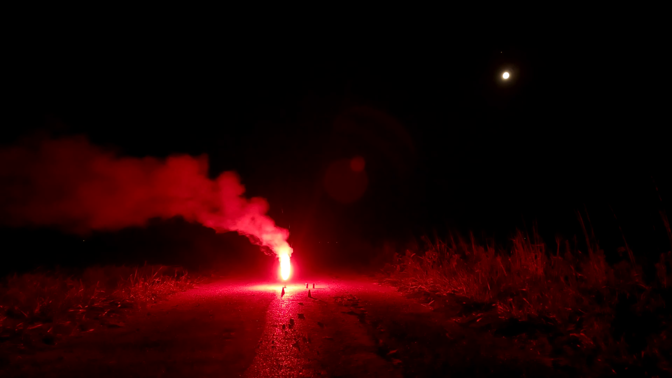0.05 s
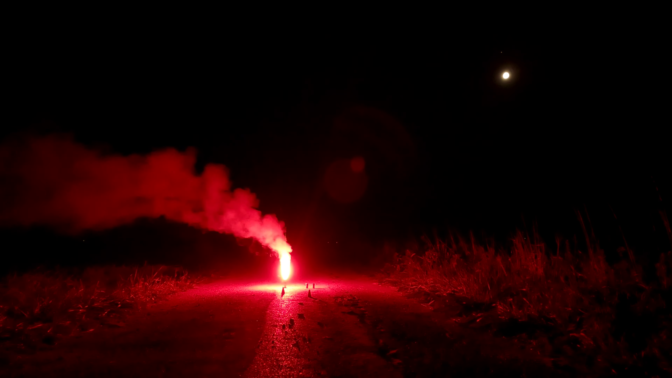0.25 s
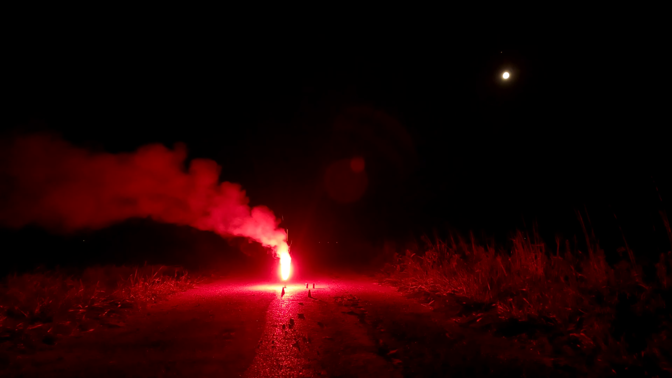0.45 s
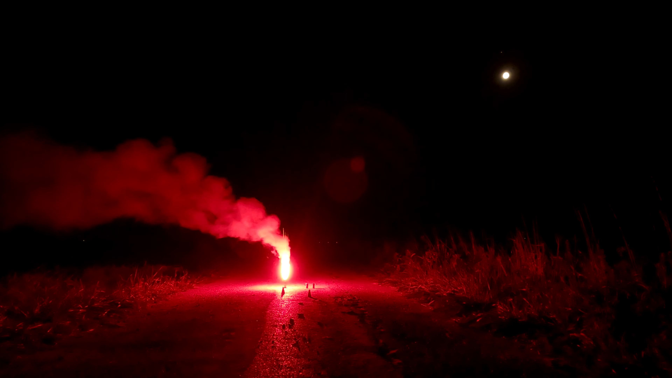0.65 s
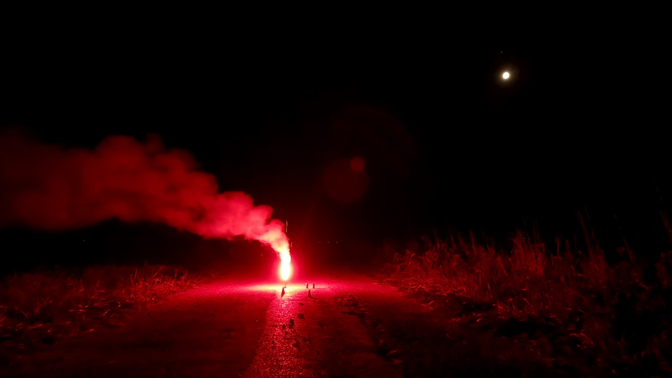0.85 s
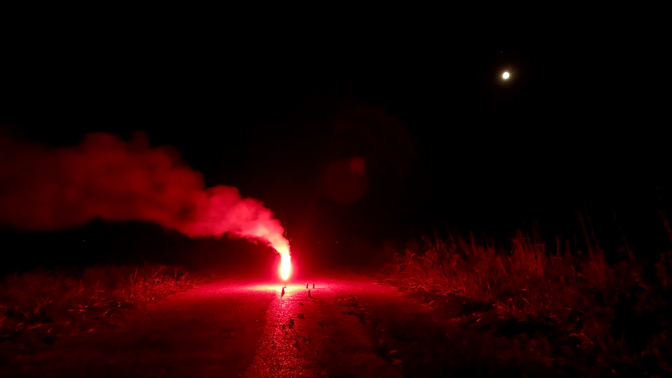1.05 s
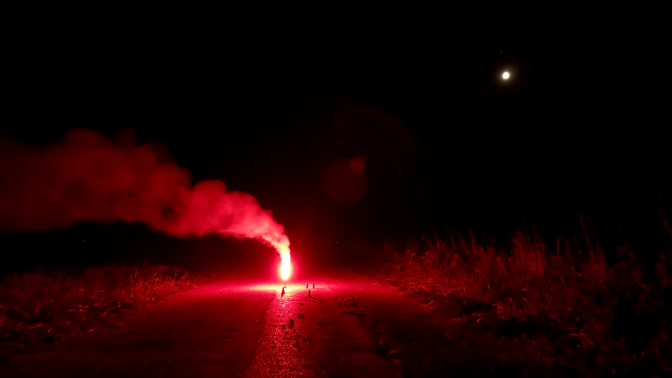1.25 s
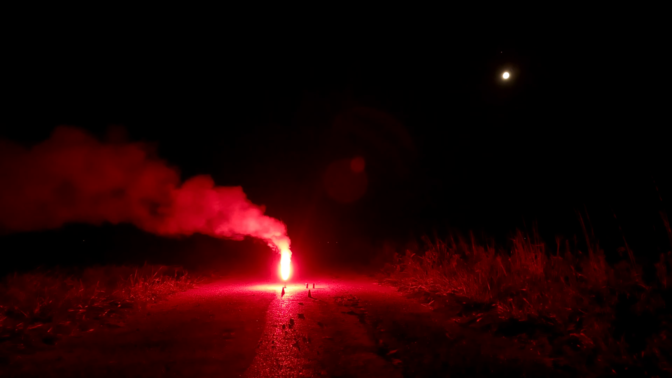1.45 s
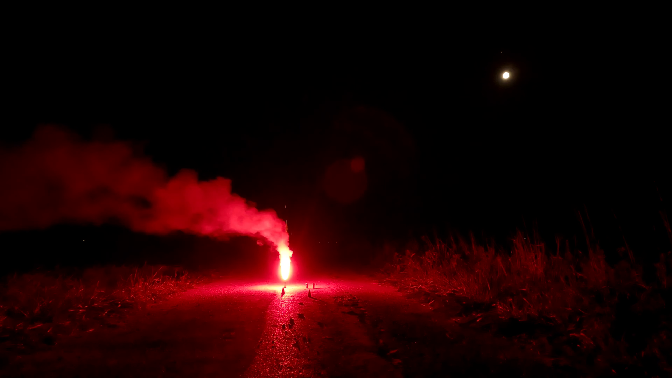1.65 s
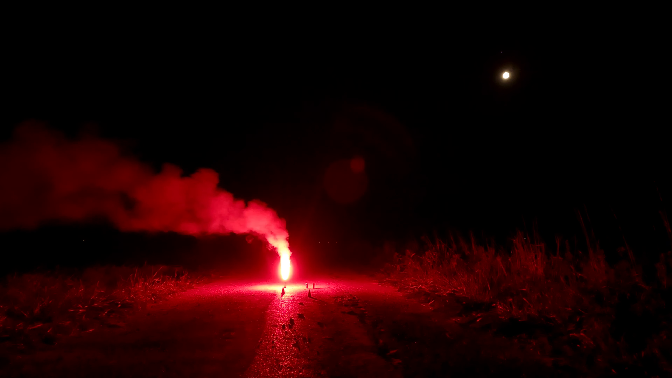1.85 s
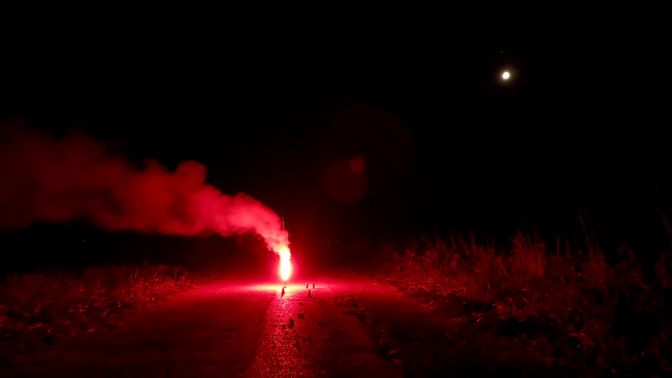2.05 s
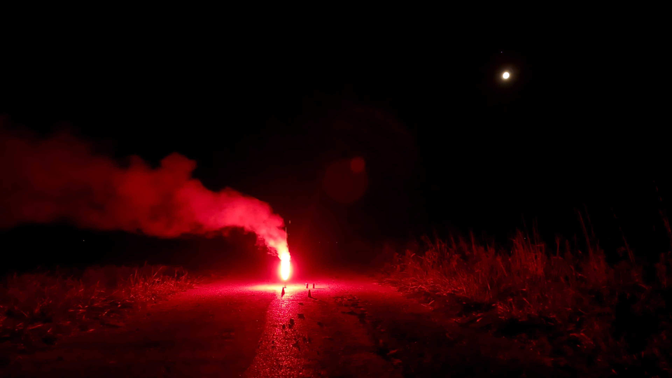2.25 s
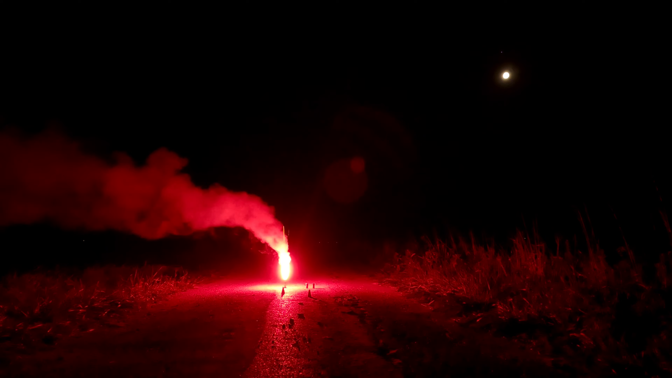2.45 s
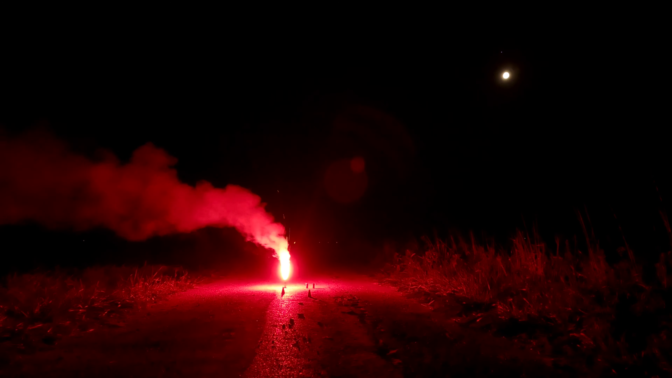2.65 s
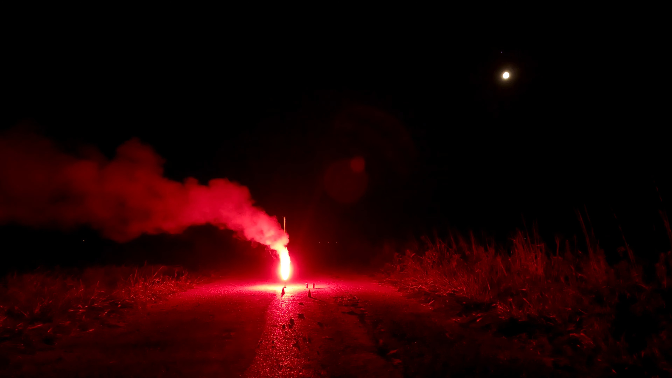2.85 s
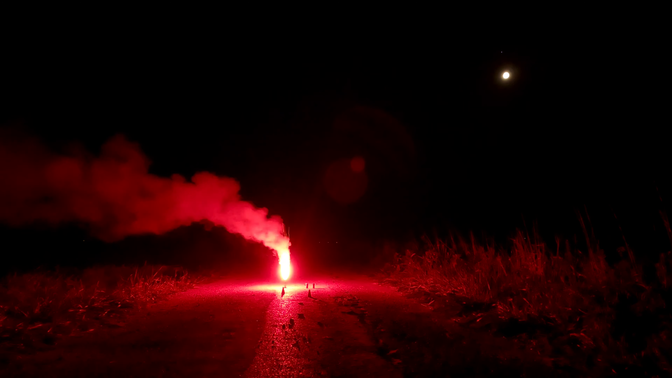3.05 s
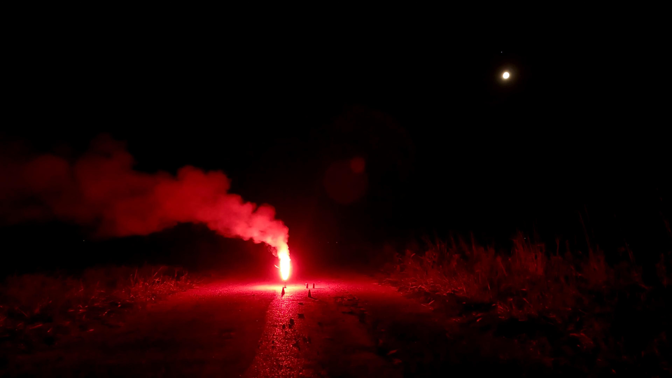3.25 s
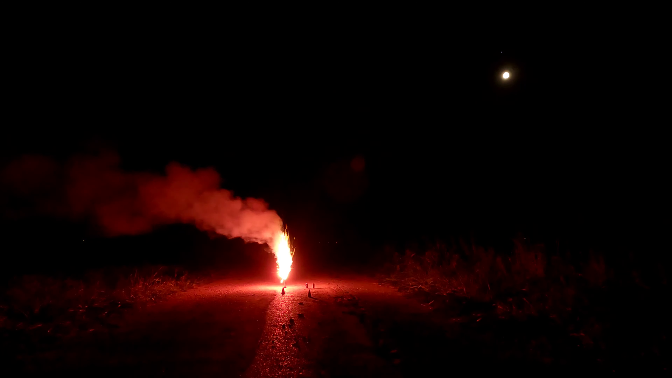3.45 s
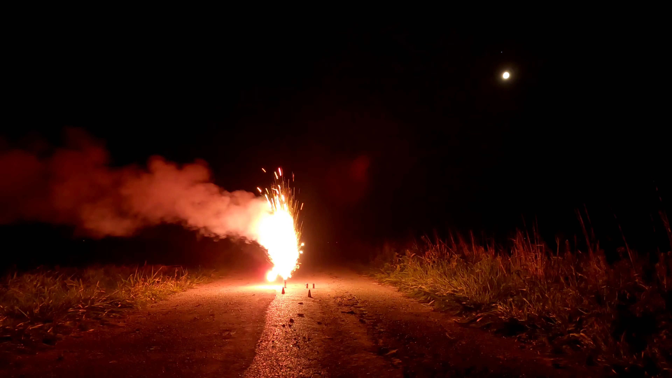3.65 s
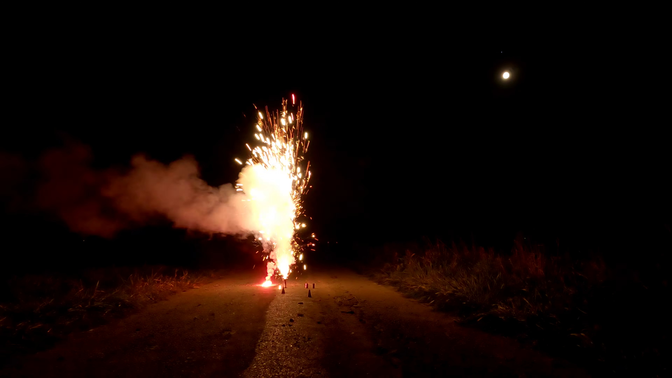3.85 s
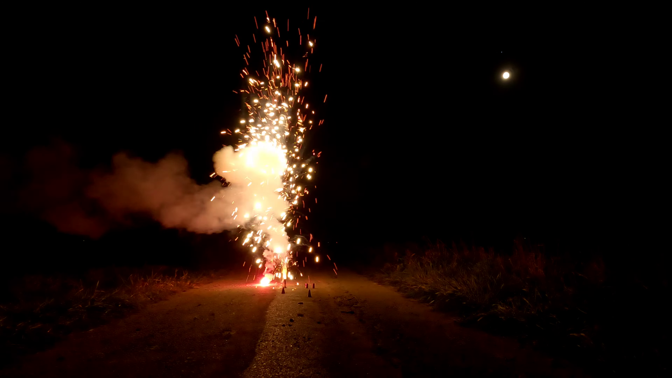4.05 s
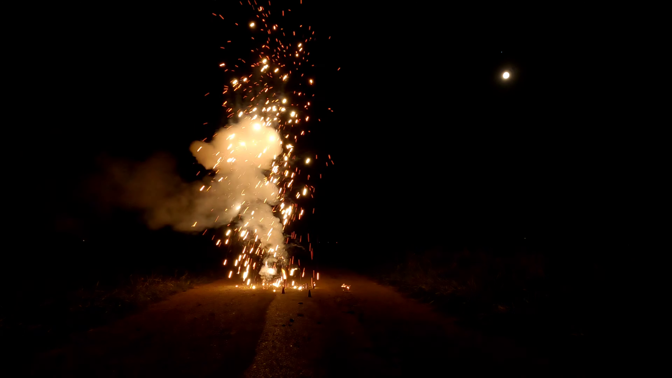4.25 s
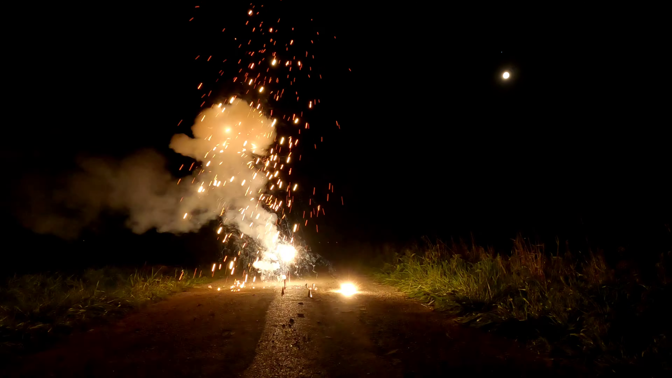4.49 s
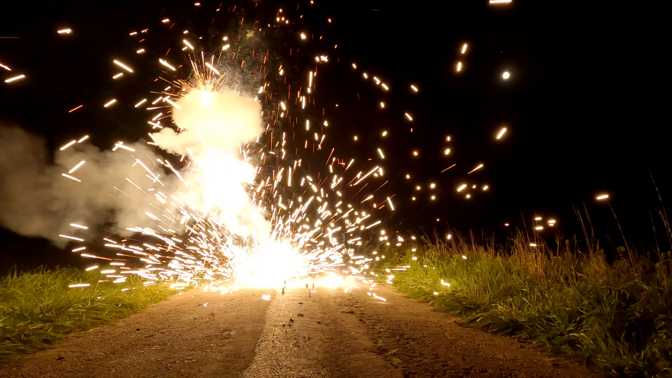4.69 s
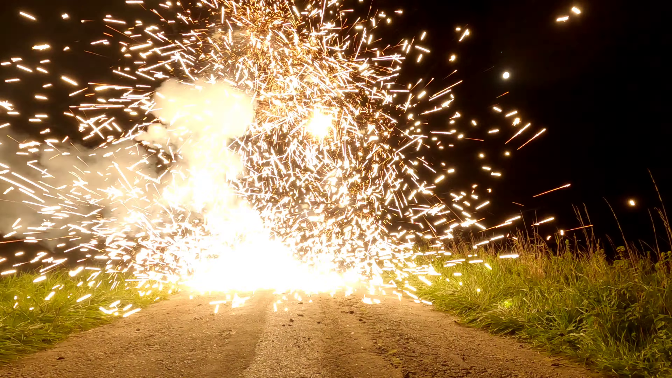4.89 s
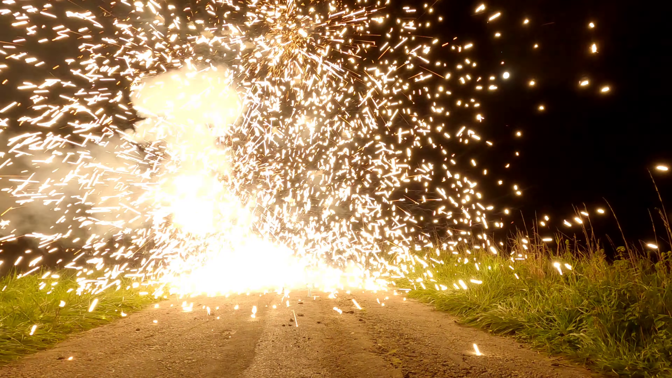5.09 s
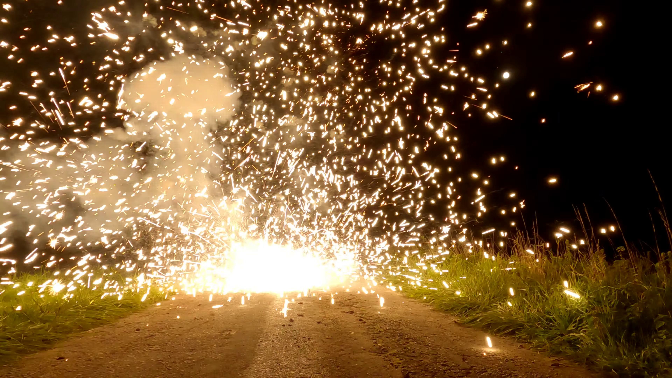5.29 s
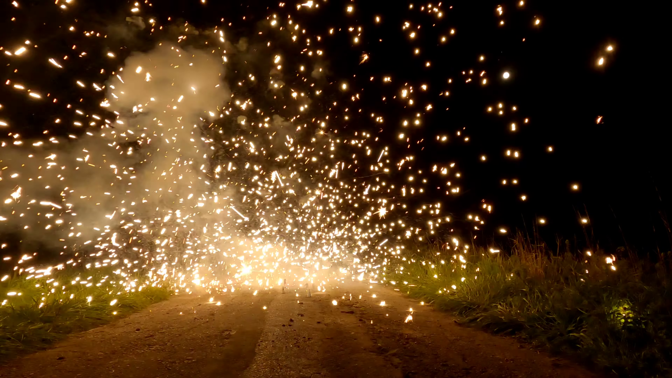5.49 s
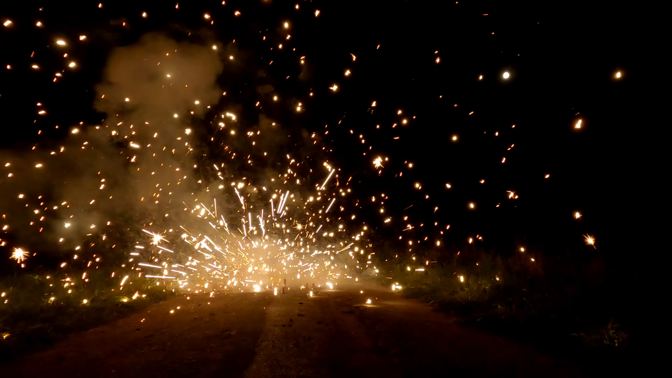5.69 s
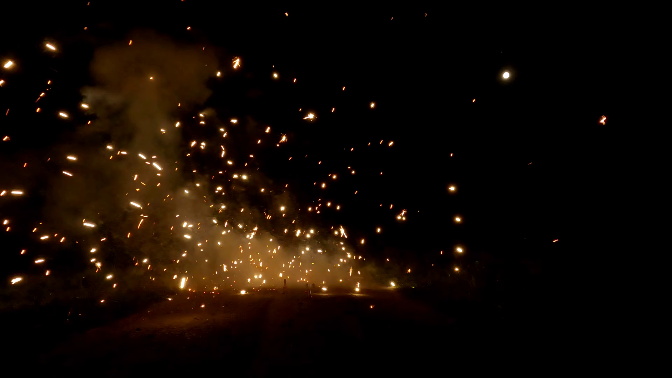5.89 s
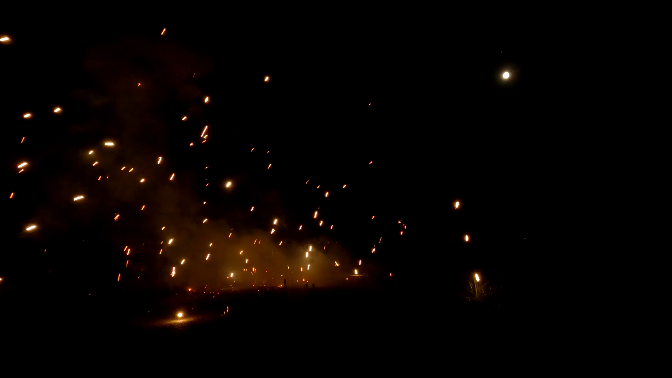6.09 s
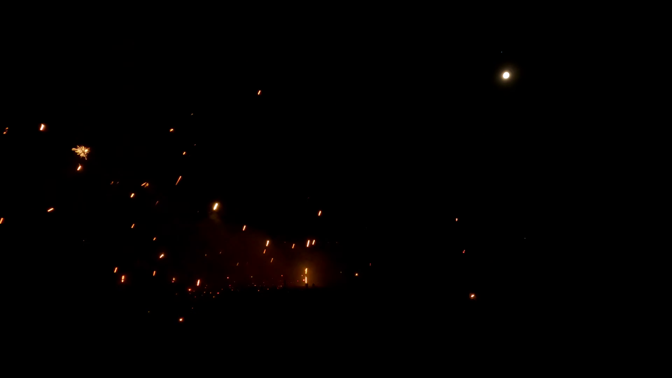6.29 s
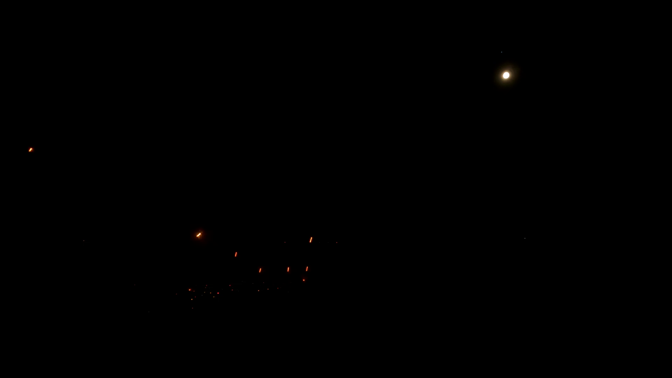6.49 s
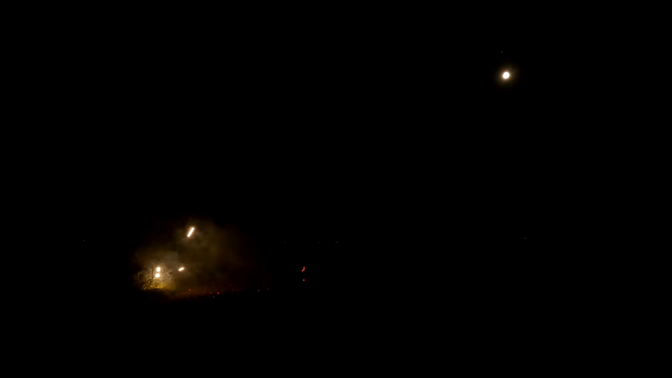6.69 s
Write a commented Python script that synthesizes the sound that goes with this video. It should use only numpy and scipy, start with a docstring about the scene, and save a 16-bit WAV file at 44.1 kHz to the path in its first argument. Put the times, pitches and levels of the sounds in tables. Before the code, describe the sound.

Steady fluttering flare hiss gives way to a short roaring spark fountain, then a dense overloaded volley of cracks, sparse ticks, one late loud bang.

```python
"""Flare and ground firework

A red flare hisses on a country road at night: shaped noise, flutter and random sputter.
It lights a ground firework, which roars up in a jet of sparks and fizzes: swells of noise and tiny snaps.
It bursts into a volley of crackling stars: shocks, gas pushes and thumps, scattered by gravel and fields.
The last sparks tick and die away over the fields; one late star goes off."""
import sys
import numpy as np
from scipy import signal
from scipy.fft import rfft, irfft, next_fast_len
from scipy.io import wavfile

SR = 44100
rng = np.random.default_rng(int(sys.argv[2]) if len(sys.argv) > 2 else 0)


def wrap_up_sound(samples):
    """Save the sound to the file named by the first command line argument, as 16-bit audio."""
    columns = np.atleast_2d(samples).T
    # keep every value between -1 and 1, then stretch to whole-number steps
    tamed = np.clip(columns, -1, 1)
    steps = np.round(tamed * 32767).astype(np.int16)
    wavfile.write(sys.argv[1], SR, steps)


N = 296793
TIME_S = np.arange(N) / SR

# Relative noise spectra. Each row: frequency in Hz, density in dB per Hz.
NIGHT_SPECTRUM = [(100, 4.5), (700, -17), (1100, 3.5), (1700, 5), (5000, -13), (15000, -38)]
WIND_SPECTRUM = [(20, -1.5), (35, 1.5), (70, 1.5), (250, -53.5)]
FLARE_SPECTRUM = [(20, -22), (45, -0.5), (110, 0), (260, -4), (500, -8.5), (1000, -12), (1800, -16),
                  (2600, -11.5), (3500, -17.5), (5100, -19.5), (5900, -31), (8800, -35), (12200, -41.5),
                  (15500, -45.5)]
SPUTTER_SPECTRUM = [(500, -21), (2500, 0), (6000, -7.5), (9000, -7.5), (12300, -11.5), (15500, -26)]
JET_SPECTRUM = [(15, -47), (25, -14.5), (70, -2.5), (117, -3), (317, -5.5), (363, -9.5), (439, -10),
                (818, -14), (911, -9.5), (1330, -13), (1560, -14.5), (3340, -22.5), (5000, -23),
                (5730, -32.5), (12200, -41), (16000, -57)]
FIZZ_SPECTRUM = [(300, -25), (700, -12.5), (1100, -0.5), (3000, -2), (5500, 0.5), (8000, -2), (10500, -9),
                 (12300, -11), (15500, -19.5)]
RUMBLE_SPECTRUM = [(20, -10), (60, 1.5), (110, 0.5), (160, -5.5), (230, -15), (350, -17), (600, -38),
                   (1500, -58)]

# Relative spectra of reflections off gravel and grass, then far fields. Each row: frequency in Hz, dB per Hz.
SCATTER_SPECTRUM = [(60, -7), (250, 6.5), (600, 3), (1500, -0.5), (3200, -1.3), (5000, 3), (7000, 1.5),
                    (12000, -16), (15500, -24)]
FAR_ECHO_SPECTRUM = [(200, 4), (600, 0.5), (1200, -1.5), (2500, -4.5), (5000, -2), (15000, -35)]

# Left-right correlation of noise. Each row: frequency in Hz, correlation from 0 to 1.
EAR_LIKENESS = [(60, 1), (300, 1), (1400, 1), (3100, 0.98), (7000, 0.92), (11000, 0.26), (15000, .3)]

# Phase lag of the left microphone port. Each row: frequency in Hz, lag in radians.
PORT_PHASE_LAG = [(150, .02), (3000, 0.62), (8000, 0.23), (11500, 1.13), (14000, 1.8)]

# Breeze on the microphone. Each row: start in seconds, attack in seconds, hold in seconds,
# level in dB, release in dB per second.
GUSTS = [(1.2, .22, 1.05, -41, 34)]

# Fuse puff, jet catching, surge, guttering. Each row: start in seconds, attack in seconds,
# hold in seconds, level in dB, release in dB per second.
JET_SURGES = [(3.295, .01, .006, -35, 500), (3.32, .21, .275, -26.2, 360), (3.575, .14, .028, -15.4, 350.5),
              (3.8, .03, .02, -49, 45)]

# Spark showers from the fuse, the jet, before the burst, from the stars, from the main volley, and landing.
# Each row: start in seconds, attack in seconds, hold in seconds, level in dB, release in dB per second.
SPARK_SHOWERS = [(3.315, .012, .03, -50, 100), (3.22, .43, 0.081, -37.7, 20.5),
                 (4.31, 0.19, .02, -45.5, 100), (4.55, .1, 0.63, -51, 26.5), (4.72, 0.091, 0.18, -36, 90.5),
                 (5.82, .11, .03, -57.6, 72)]

# Steady low rumble, its level rising and sinking. Each row: time in seconds, level in dB.
RUMBLE_LEVEL = [(3.3, -67), (3.8, -43.5), (4.45, -42.5), (4.8, -35.5), (6.1, -57.5), (6.73, -50)]

# Single sparks snapping. Each row: time in seconds, nominal peak in dB.
SPARKS = [(4.148, -21), (4.206, -20.5), (4.229, -23), (4.24, -17), (4.26, -15.3), (4.737, -18),
          (6.037, -28.5), (6.053, -26.5), (6.121, -25.5), (6.254, -32.5), (6.334, -28)]

# Bangs, each one star or a quick chain, with mean strengths before spread and panning. Each row:
# start in seconds, length in seconds, star count, crack in dB, crack brightness in Hz, thump in dB.
BANGS = [(4.574, 0.0013, 2, -1, 3400, -17), (4.6067, 0.0014, 2, -13.5, 4900, -16),
         (4.6393, 0.012, 2, -8, 3950, -12), (4.6821, 0, 1, -5.7, 3700, -8.5),
         (4.7021, .0065, 2, -6.2, 3200, -8.3), (4.76, 0.012, 3, -4.5, 4340, -9.5),
         (4.9927, .0013, 2, -6.5, 3900, -13.5), (5.0097, .0067, 2, -7, 3700, -13.5),
         (5.034, 0, 1, -7.5, 6000, -11), (5.0425, .0044, 3, -6, 3700, -17),
         (5.0835, .012, 4, -7, 3200, -12), (5.1029, .01, 3, -7.5, 5000, -17),
         (5.1395, .010, 2, -6, 4520, -12.5), (5.163, 0.011, 2, -10, 4700, -17),
         (5.241, 0.00064, 2, -4.6, 5300, -17.5), (5.2567, 0.0092, 4, -8, 3220, -13),
         (5.3099, .0092, 3, -6, 3000, -10.7), (5.3301, .0175, 3, -6.8, 3600, -12),
         (5.3677, 0, 1, -6, 2700, -16), (5.3949, 0.0034, 2, -5.5, 5000, -14),
         (5.4249, .0195, 3, -7.5, 3690, -13), (5.4964, 0.00095, 2, -6.5, 3490, -14),
         (5.6321, 0, 1, -2, 3100, -11), (5.6627, 0, 1, -7, 4700, -12.5),
         (5.7384, .0018, 2, -4.5, 3800, -12), (5.7508, 0, 1, -8.5, 2900, -16),
         (5.8177, 0.0017, 1, -5.5, 3980, -13), (6.6586, 0, 1, 0.3, 2750, -12)]

# Main volley, where most stars catch at once. Each row: time in seconds, stars per second.
VOLLEY_RATE = [(4.789, 210), (4.815, 125), (4.877, 90), (4.92, 270), (4.958, 115), (4.979, 115)]

ATTACK_POWER = 1.4  # a swell grows as this power of time

# The flare burns evenly until the firework smothers it.
FLARE_DB, FLARE_SAG_S, FLARE_SAG_DB = -36, 3.32, 2.5
FLARE_OUT_S, FLARE_FALL_DB_PER_S = 3.7, 185

# Faint ticks of falling embers, with nominal peaks.
EMBERS_FROM_S, EMBERS_TO_S, EMBERS_PER_S = 5.89, 6.11, 65
EMBER_MIN_DB, EMBER_SPREAD_DB = -40, 9

# Stars of one batch differ in timing (share of their spacing), strength and brightness.
STAR_JITTER, STAR_SPREAD_DB, STAR_SPREAD_OCT = .35, 1.5, .3
STAR_PAN_DB = 3.5  # left-right placing, full range per ear
VOLLEY_CRACK_DB, VOLLEY_BRIGHT_HZ, VOLLEY_THUMP_DB, VOLLEY_JITTER = -7.0, 3940, -13.4, .5

PORT_RING_HZ, PORT_RING_Q, PORT_RING_DB = 12100, 9, -3
ROLLOFF_HZ, CUTOFF_HZ = 13200, 16300


def from_db(db):
    """Decibels to gain."""
    return 10 ** (np.asarray(db) / 20)


def rms_one(x):
    """Scale to unit power."""
    return x / np.sqrt(np.mean(x ** 2) + 1e-20)


def add(track, start_s, sound):
    """Mix a short sound in at its start time."""
    i = int(round(start_s * SR))
    track[..., i:i + sound.shape[-1]] += sound[..., :N - i]


def level(rows):
    """Gain over time, interpolated in dB."""
    return from_db(np.interp(TIME_S, *np.transpose(rows)))


def swells(rows):
    """Gain over time of overlapping swells, summed in power."""
    power = 0
    for start_s, attack_s, hold_s, db, release_db_per_s in rows:
        rise = np.clip((TIME_S - start_s) / attack_s, 0, 1) ** ATTACK_POWER
        released_s = np.maximum(TIME_S - start_s - attack_s - hold_s, 0)
        power = power + (rise * from_db(db - release_db_per_s * released_s)) ** 2
    return np.sqrt(power)


def at_hz(points, hz):
    """Read a curve on a log-frequency axis."""
    f, value = np.transpose(points)
    return np.interp(np.log(np.maximum(hz, 1)), np.log(f), value)


def colour(x, spectrum):
    """Filter a signal by a spectrum."""
    n = x.shape[-1]
    gain = from_db(at_hz(spectrum, np.fft.rfftfreq(n, 1 / SR)))
    return irfft(rfft(x) * gain, n)


def lowpass(x, order, cutoff_hz):
    """Butterworth low-pass."""
    return signal.sosfilt(signal.butter(order, cutoff_hz, fs=SR, output="sos"), x)


def drift(rate_hz):
    """Smooth random wander of spread 1, with rate_hz knots per second."""
    knots = rng.standard_normal(4096)
    return rms_one(np.interp(TIME_S * rate_hz, np.arange(len(knots)), knots))


def noise(spectrum, flicker_db, flicker_hz):
    """Stereo noise, alike in both ears in the bass, with a level that flickers by flicker_db."""
    n = next_fast_len(N)
    hz = np.fft.rfftfreq(n, 1 / SR)
    alike = np.clip(at_hz(EAR_LIKENESS, hz), 0, 1)
    mid, side = rfft(rng.standard_normal((2, n)))
    both = np.sqrt(1 + alike) * mid + np.sqrt(1 - alike) * side * [[1], [-1]]
    steady = irfft(both * from_db(at_hz(spectrum, hz)), n)[:, :N]
    return rms_one(steady * from_db(flicker_db * drift(flicker_hz)))


def grains(per_s, spread_db, spectrum):
    """Tiny random snaps of uneven size and either sign."""
    sizes = from_db(spread_db * np.minimum(rng.exponential(1, N), 4)) * rng.choice([-1, 1], N)
    clicks = sizes * (rng.random(N) < per_s / SR)
    padded = np.pad(clicks, (0, next_fast_len(N) - N))
    return rms_one(colour(padded, spectrum)[:N])


def scatter(spectrum, t60_s, rise_s, size):
    """A dying spray of small reflections, of unit energy per ear on average."""
    t = TIME_S[:size]
    envelope = from_db(-60 * t / t60_s) * (1 - np.exp(-t / rise_s))
    tail = colour(rng.standard_normal((2, size)), spectrum) * envelope
    tail = tail[0] + 0.76 * tail[1] * [[1], [-1]]
    return rms_one(tail) / np.sqrt(size)


def two_pole(f, hz, q):
    """Response of a damped resonator, read at frequencies f."""
    return 1 / (1 - (f / hz) ** 2 + 1j * f / (hz * q))


def shock(hz, low_share=0.21, low_q=1.28, top_q=0.88, air_hz=7500, size=2048):
    """A steep pressure spike and its suction, rounded by the air; a lower hz is longer and duller."""
    f = np.fft.rfftfreq(size, 1 / SR)
    resonance = two_pole(f, hz * low_share, low_q) * two_pole(f, hz, top_q)
    wave = irfft(-f ** 2 * resonance / (1 + 1j * f / air_hz))
    return 2 * wave / np.ptp(wave)


def night_air():
    """Quiet night air: faint, slowly flickering noise."""
    return from_db(-65.3) * noise(NIGHT_SPECTRUM, flicker_db=.5, flicker_hz=4)


def wind():
    """Breeze on the microphone: a swell of low turbulence."""
    return swells(GUSTS) * noise(WIND_SPECTRUM, flicker_db=-1.5, flicker_hz=9.3)


def rumble():
    """Steady low rumble, its level rising and sinking."""
    return level(RUMBLE_LEVEL) * noise(RUMBLE_SPECTRUM, flicker_db=0.0, flicker_hz=25)


def flare_burn():
    """Gain of the flare: steady, a step down as the fuse catches, then out."""
    sag_db = FLARE_SAG_DB * (TIME_S > FLARE_SAG_S)
    fall_db = FLARE_FALL_DB_PER_S * np.maximum(TIME_S - FLARE_OUT_S, 0)
    return from_db(FLARE_DB - sag_db - fall_db)


def flare():
    """Gas rushes from the tube, its low roar flutters, and specks of slag sputter."""
    rush = noise(FLARE_SPECTRUM, flicker_db=0.4, flicker_hz=27)
    flutter = lowpass(rush, 1, 1100) * (from_db(1.9 * drift(18)) - 1)
    slag = grains(per_s=500, spread_db=4.0, spectrum=SPUTTER_SPECTRUM)
    sputter = from_db(-22.5) * slag * from_db(2 * drift(12.05))
    return flare_burn() * (rush + flutter + sputter) * from_db([[-.3], [.3]])


def fountain():
    """A roaring jet of flickering noise, and the fizz of its sparks: hiss and tiny snaps."""
    jet = swells(JET_SURGES) * noise(JET_SPECTRUM, flicker_db=1.3, flicker_hz=82) * from_db([[-.5], [.5]])
    hiss = noise(FIZZ_SPECTRUM, flicker_db=1.5, flicker_hz=53)
    fizz = 0.83 * hiss + 0.44 * grains(per_s=1500, spread_db=5.5, spectrum=FIZZ_SPECTRUM)
    return jet + swells(SPARK_SHOWERS) * fizz


def embers():
    """Falling embers tick at uneven steps: rows (s, nominal peak dB)."""
    when, size = rng.random((2, 16))
    times = EMBERS_FROM_S + (np.arange(len(when)) + when) / EMBERS_PER_S
    return [(s, EMBER_MIN_DB + EMBER_SPREAD_DB * k) for s, k in zip(times, size) if s < EMBERS_TO_S]


def sparks():
    """Stray sparks and embers snap like very small stars, each with a quick echo off the road."""
    out = np.zeros(N)
    chance = rng.random((32, 2))
    for (start_s, peak_db), (lag, bright) in zip(SPARKS + embers(), chance):
        snap = from_db(peak_db - 5.0) * shock(hz=4200 + 2100 * bright)
        add(out, start_s, snap)
        add(out, start_s + .0003 + .0009 * lag, 0.93 * snap)
    return out


def puff(lead_s=0.02, swell_db=-22, peak_db=-18, top_hz=1200):
    """A dull puff of low-passed noise swells into the first bang."""
    before = (BANGS[0][0] - TIME_S) / lead_s
    swell = from_db(peak_db + swell_db * np.clip(before, 0, 10)) * (before > 0)
    return swell * rms_one(lowpass(rng.standard_normal(N), 3, top_hz))


def thump(hz=66, q=0.41, top_hz=215, top_q=0.65, lag_s=.0012, size=2048):
    """The slow, heavily damped low swing heard after a crack, as the microphone recovers."""
    f = np.fft.rfftfreq(size, 1 / SR)
    resonance = two_pole(f, hz, q) * two_pole(f, top_hz, top_q)
    wave = irfft(-1j * f * resonance * np.exp(-2j * np.pi * f * lag_s))
    return wave / np.abs(wave).max()


def gas_push(width_s=0.0018, size=2048):
    """The fireball swells: one short hump of pressure behind the shock."""
    return np.sin(np.pi * np.minimum(TIME_S[:size] / width_s, 1)) ** 2


def varied(times, crack_db, hz, thump_db):
    """Stars of one batch, each of its own size and brightness: rows (s, crack dB, Hz, thump dB)."""
    chance = rng.standard_normal((len(times), 3))
    size, bright, push = (chance - chance.mean(axis=0)).T
    cracks_db = crack_db + STAR_SPREAD_DB * size
    thumps_db = thump_db + STAR_SPREAD_DB * (size + push)
    return np.column_stack([times, cracks_db, hz * 2 ** (STAR_SPREAD_OCT * bright), thumps_db])


def chain(start_s, length_s, count, crack_db, hz, thump_db):
    """One star sets off its neighbours at uneven steps."""
    steps = np.arange(round(count), dtype=float)
    steps[1:-1] += STAR_JITTER * rng.uniform(-1, 1, len(steps))[1:-1]
    return varied(start_s + length_s * steps / max(steps[-1], 1), crack_db, hz, thump_db)


def volley():
    """Stars go off at uneven steps, as fast as the fire spreads among them."""
    lit = np.cumsum(np.interp(TIME_S, *np.transpose(VOLLEY_RATE), left=0, right=0)) / SR
    turns = np.arange(64) + .5 + VOLLEY_JITTER * rng.uniform(-1, 1, 64)
    times = np.interp(turns, lit, TIME_S)
    batch = varied(times, VOLLEY_CRACK_DB, VOLLEY_BRIGHT_HZ, VOLLEY_THUMP_DB)
    return batch[turns < lit[-1]]


def stars():
    """Each star gives a shock, its echo off the road, a gas push and a thump; gravel scatters the shock."""
    cracks, lows = np.zeros((2, 2, N))
    swing, push = thump(), gas_push()
    fired = np.vstack([chain(*bang) for bang in BANGS] + [volley()])
    chance = rng.random((128, 3))
    for (start_s, crack_db, hz, thump_db), (height, bounce, place) in zip(fired, chance):
        side = from_db(STAR_PAN_DB * (place - .5) * np.array([[1], [-1]]))
        heavy = np.clip(1 + crack_db / 5, 0, 1)  # heavy charges pack their energy into the midrange
        crack = from_db(crack_db + 1.2 * heavy) * shock(hz, low_share=0.22 + .15 * heavy)
        add(cracks, start_s, crack * side)
        echo_s = 0.00032 + 0.0022 * height  # higher stars echo later
        add(cracks, start_s + echo_s, .62 * bounce * (1 - heavy) * crack)
        gravel = scatter(SCATTER_SPECTRUM, t60_s=0.017, rise_s=.0003, size=1024)
        add(cracks, start_s, from_db(crack_db - 2.5 - 3.0 * heavy) * gravel)
        low = from_db(thump_db) * swing + from_db(crack_db - 15.5) * push
        add(lows, start_s, side * low)
    return cracks, lows


def fields(x):
    """Grass on the verges answers at once and brightly; far fields return a faint dull wash."""
    near = from_db(-20.5) * scatter(SCATTER_SPECTRUM, t60_s=0.067, rise_s=0.0046, size=SR // 4)
    far = from_db(-32) * scatter(FAR_ECHO_SPECTRUM, t60_s=2.7, rise_s=.03, size=2 * SR)
    return signal.fftconvolve(x, near, axes=1)[:, :N] + signal.fftconvolve(x, far, axes=1)[:, :N]


def off_axis(x):
    """Off the microphone's axis the bass leans to the right and the treble to the left."""
    low = lowpass(x, 1, 1800)
    return low * from_db([[-1.4], [1.4]]) + (x - low) * from_db([[1.2], [-1.2]])


def scene():
    """Flare, fountain and bangs over a low rumble, a light breeze and the quiet night air."""
    background = night_air() + rumble()
    breeze = wind()
    burning = flare() + fountain()
    cracks, lows = stars()
    snaps = cracks + sparks()
    direct = off_axis(snaps + lows + puff() + breeze)
    return background + burning + direct + fields(snaps)


def record(dry):
    """The left port lags, the right one rings, loud peaks overload, the capsules roll off, the top is cut."""
    n = next_fast_len(N)
    lag_rad = at_hz(PORT_PHASE_LAG, np.fft.rfftfreq(n, 1 / SR))
    left = irfft(rfft(dry[0], n) * np.exp(-1j * lag_rad), n)[:N]
    ring = signal.lfilter(*signal.iirpeak(PORT_RING_HZ, PORT_RING_Q, fs=SR), dry[1])
    right = dry[1] + from_db(PORT_RING_DB) * ring
    clipped = np.clip([left, right], -1, 1)
    heard = lowpass(clipped, 6, ROLLOFF_HZ)
    top_cut = signal.firwin(129, CUTOFF_HZ, fs=SR)[None]
    return signal.fftconvolve(heard, top_cut, mode="same", axes=1)


dry = scene()
out = record(dry)
wrap_up_sound(out)
```